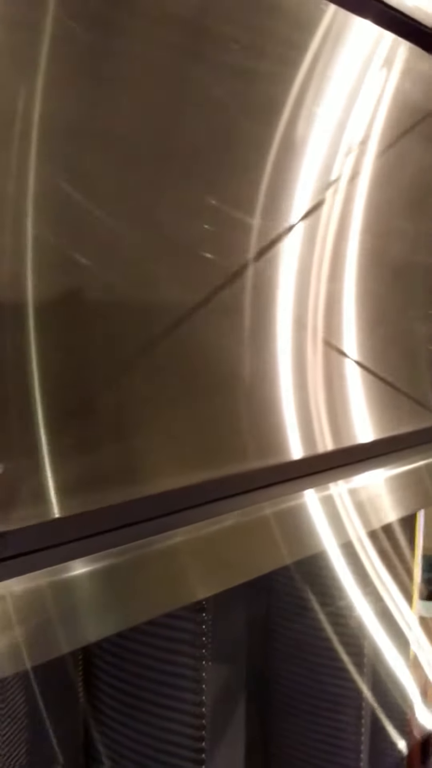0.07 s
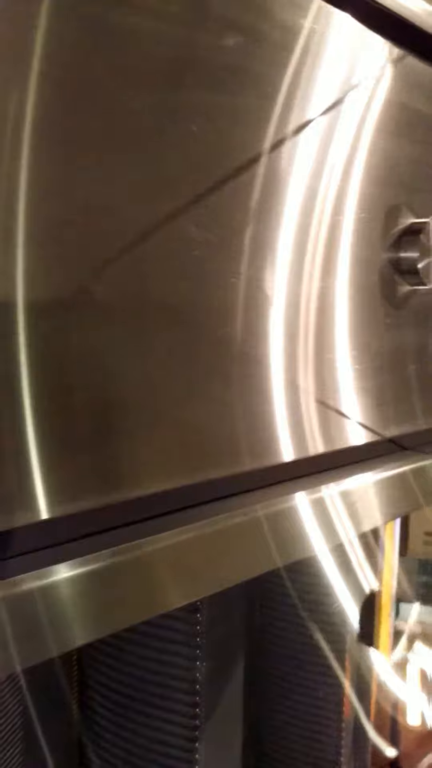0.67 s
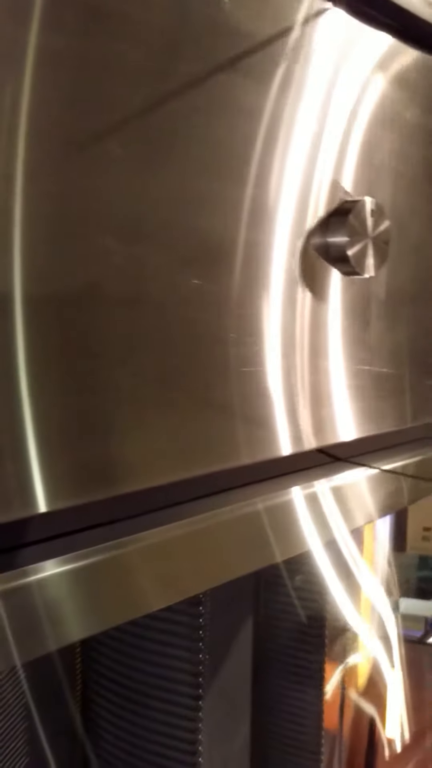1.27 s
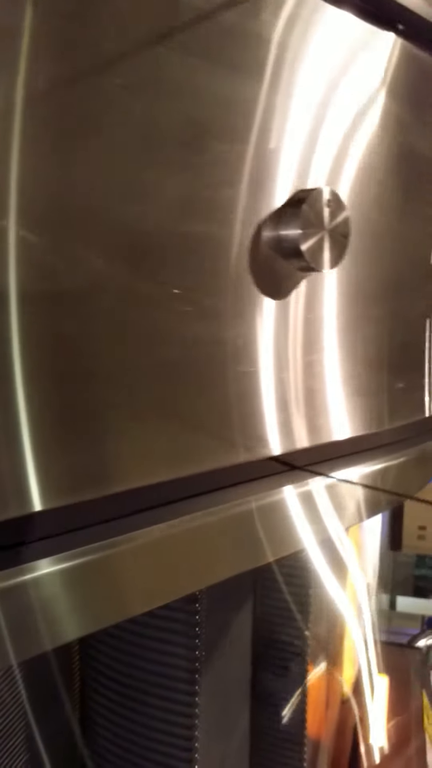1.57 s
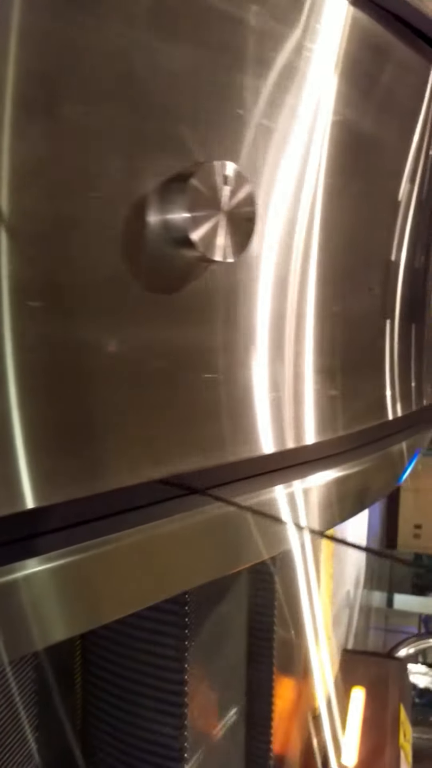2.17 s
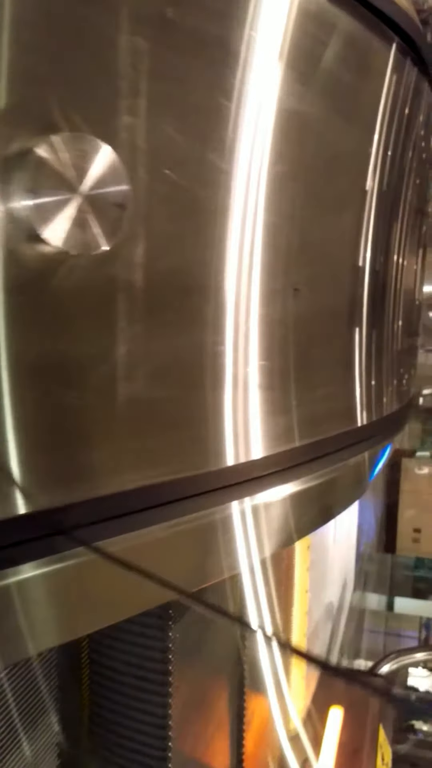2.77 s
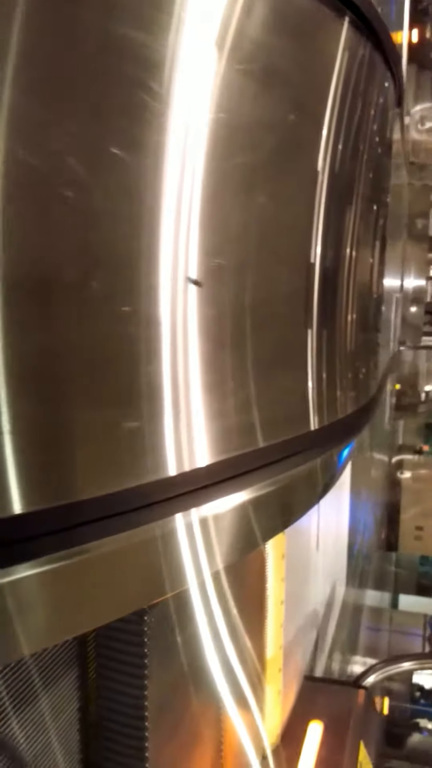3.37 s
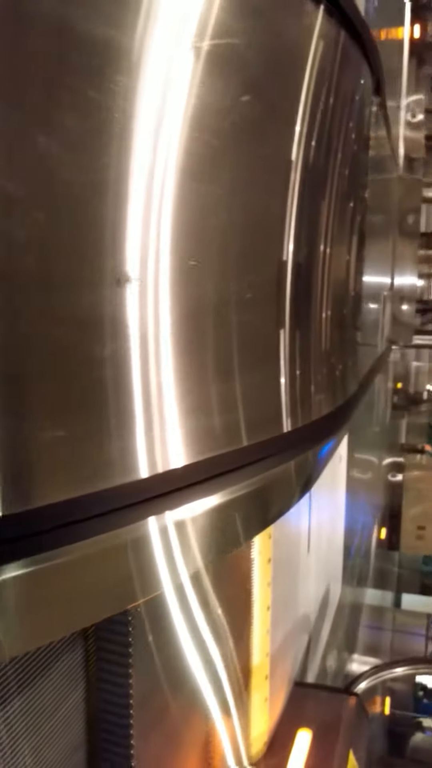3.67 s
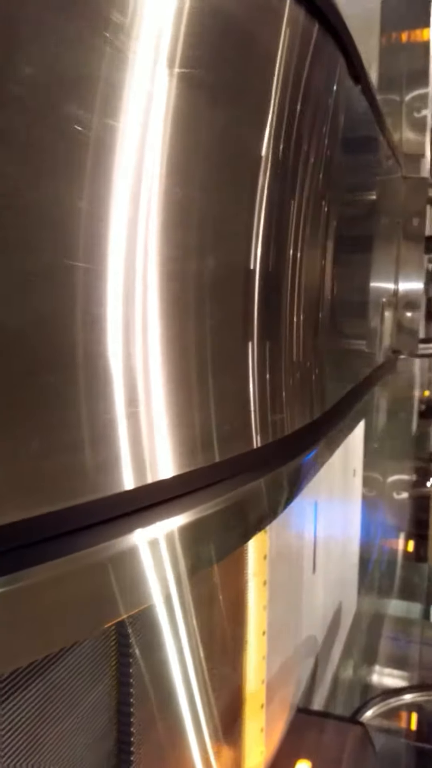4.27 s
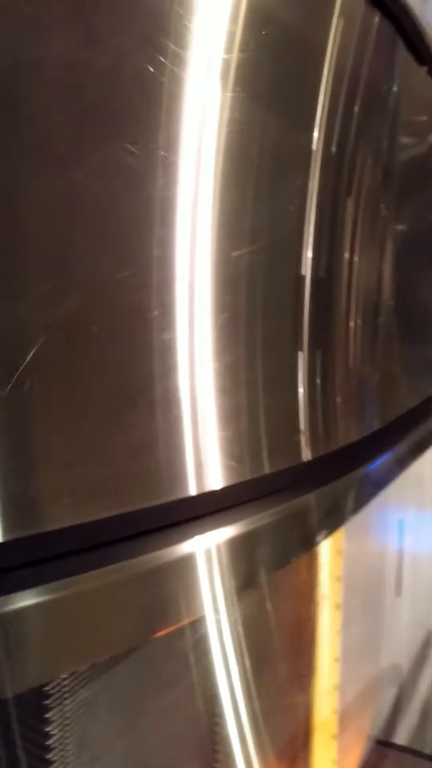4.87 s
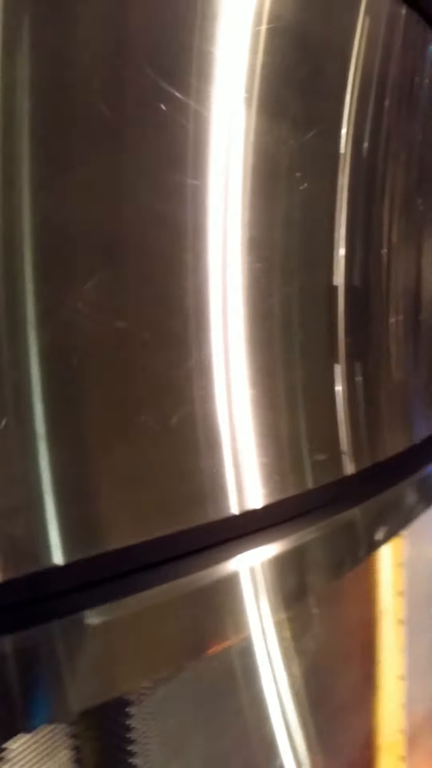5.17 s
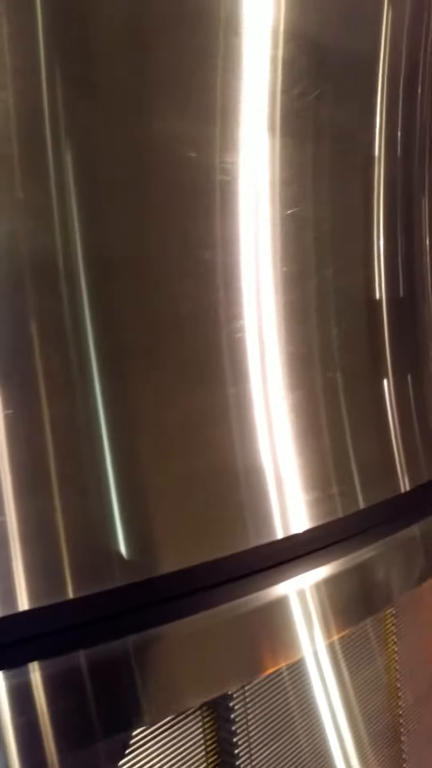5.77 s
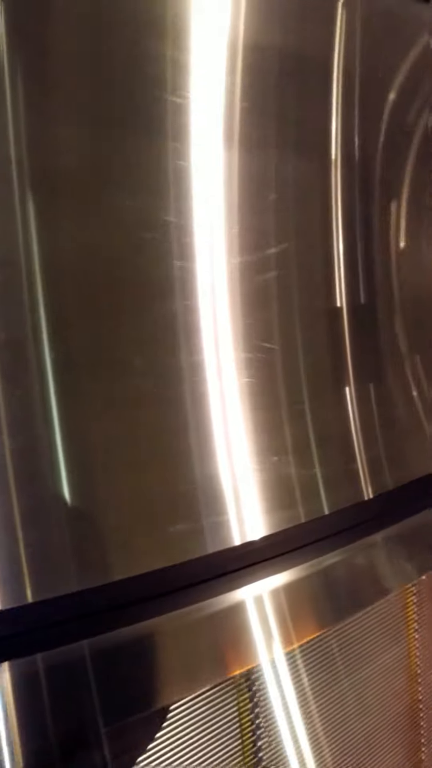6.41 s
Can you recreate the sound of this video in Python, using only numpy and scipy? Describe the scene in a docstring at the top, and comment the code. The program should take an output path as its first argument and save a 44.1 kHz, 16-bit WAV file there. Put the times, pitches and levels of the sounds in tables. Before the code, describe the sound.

The low throbbing drone of a running escalator, with a hissing handrail and a few soft step knocks.

```python
"""An escalator's motor hums and throbs, heard from a moving step in a large hall.
The stereo microphone rides close to the steel side panel. The gearing drones, the truss rumbles
under the steps, and step rollers swell as they pass. The handrail hisses in its guide, pulsing
with the chain, ringing between the panels and sometimes squeaking. Now and then steps knock
and steel edges clink; near the end a panel booms twice."""
import sys
import numpy as np
from scipy import signal
from scipy.fft import rfft, irfft
from scipy.io import wavfile
from scipy.ndimage import uniform_filter1d

SR = 44100
rng = np.random.default_rng(int(sys.argv[2]) if len(sys.argv) > 2 else 0)


def store_pcm(level_fs):
    """Save levels as 16-bit WAV."""
    pcm = np.round(np.clip(level_fs, -1, 1) * 32767).astype(np.int16)
    wavfile.write(sys.argv[1], SR, np.atleast_2d(pcm).T)


N = 288414
TIME = np.arange(N) / SR
FREQS = np.maximum(np.fft.rfftfreq(N, 1 / SR), 1)
SIDES = np.array([[1], [-1]])   # left, right


def from_db(db):
    """Decibels to gain."""
    return 10 ** (np.asarray(db) / 20)


def unit_rms(x):
    """Scale to rms 1."""
    return x / np.sqrt(np.mean(x ** 2) + 1e-20)


def over_time(points):
    """Join (seconds, value) points into a curve."""
    return np.interp(TIME, *np.transpose(points))


def across_hz(points):
    """Join (Hz, value) points on a log frequency axis."""
    hz, value = np.transpose(points)
    return np.interp(np.log(FREQS), np.log(hz), value)


def hump(hz, octaves):
    """Gain over frequency of a broad resonance."""
    return 1 / (1 + (np.log2(FREQS / hz) / octaves) ** 4)


def bell(centre_s, half_s):
    """A smooth swell of height 1 around a moment."""
    return np.exp(-((TIME - centre_s) / half_s) ** 2)


def approach(start_db, db_per_s, nearest_s):
    """A level in dB that rises as a source nears the microphone, then holds."""
    return start_db + db_per_s * np.minimum(TIME, nearest_s)


def pan(db):
    """Channel gains at constant power, the left louder by db."""
    gains = from_db(SIDES * db / 2)
    return gains / np.sqrt(np.mean(gains ** 2, axis=0))


def drift(rate_hz):
    """A smooth random wander with a spread of 1."""
    hop, settle = 40, 2000
    pole = np.exp(-2 * np.pi * rate_hz * hop / SR)
    noise = rng.standard_normal(N // hop + settle + 2)
    slow = signal.lfilter([1], [1, -2 * pole, pole * pole], noise)[settle:]
    return np.interp(np.arange(N) / hop, np.arange(len(slow)), unit_rms(slow))


def tone(hz, wander_hz):
    """A sine of rms 1 whose pitch wanders a little."""
    turns = np.cumsum(hz + wander_hz * drift(1.834)) / SR + rng.random()
    return np.sqrt(2) * np.sin(2 * np.pi * turns)


def evened(noise, share, window_samples):
    """Take a share of the chance swells out of a noise."""
    power = uniform_filter1d(np.mean(noise ** 2, axis=0), window_samples) + 1e-12
    return noise * (power / power.mean()) ** (-share / 2)


def friction_ring(hz, width_hz, lead_rad, pitch_wander=.003, alike=0.86):
    """A resonance kept ringing by friction: a sine of wandering pitch, strength and phase."""
    angle = 2 * np.pi * np.cumsum(hz * (1 + pitch_wander * drift(1.5))) / SR
    mid, side = (drift(width_hz * .7) + 1j * drift(width_hz * .7) for _ in range(2))
    wander = np.sqrt((1 + alike) / 2) * mid + np.sqrt((1 - alike) / 2) * side * SIDES
    return np.real(wander * np.exp(1j * angle) * np.exp(.5j * lead_rad * SIDES))


# The sound field at the microphone. Each row: frequency in Hz, correlation of left and right.
CHANNEL_LIKENESS = [(50, 0.99), (93, 0.99), (150, 0.87), (230, 0.78), (350, 0.059), (550, 0.057),
                    (850, -0.085), (2000, 0.018)]


def stereo_noise(colour, pan_points):
    """Coloured noise, alike on both sides in the bass and diffuse above; rms 1 in the middle."""
    mid, side = rfft(rng.standard_normal((2, N)))
    alike = across_hz(CHANNEL_LIKENESS)
    spectra = np.sqrt(1 + alike) * mid + np.sqrt(1 - alike) * side * SIDES
    noise = irfft(spectra * colour * pan(across_hz(pan_points)), N)
    return noise / np.std(noise.mean(axis=0))


# The truss underfoot. Each row: frequency in Hz, relative level in dB.
TRUSS_SPECTRUM = [(10, -24), (16, -15), (22, -14.5), (36, 2), (48, -5), (59, -0.5), (78, -6.5), (105, -9.5),
                  (121, -7), (140, -11.5), (165, -16.5), (190, -12), (260, -24), (900, -64.5)]
# Where truss, rollers and knocks sit in the image. Each row: frequency in Hz, left over right in dB.
UNDERFOOT_PAN = [(50, -0.5), (110, -3), (150, 0.5), (200, -8), (300, -7.5), (400, 0.5), (560, -6.5),
                 (900, 3.5)]


def truss_rumble(step_hz=2.5, step_db=1.0):
    """The truss shakes, slowly growing louder, and a little harder as each step loads it."""
    load = np.cos(2 * np.pi * step_hz * (TIME - 0.084))
    level_db = -37 + 0.3648 * TIME + step_db * load
    shake = stereo_noise(from_db(across_hz(TRUSS_SPECTRUM)), UNDERFOOT_PAN)
    return from_db(level_db) * evened(shake, share=.35, window_samples=1800)


# Wheels on the track below the steps. Each row: frequency in Hz, relative level in dB.
ROLLER_SPECTRUM = [(130, -20.5), (200, 2.5), (250, 1.5), (310, 0.5), (390, 0.5), (480, -2), (570, -0.5),
                   (700, -3.5), (900, -9.5), (1500, -14), (8000, -63)]
# A wheel passes close to the microphone about once a second.
# Each row: time in seconds, peak level in dB, centre in Hz, half length in seconds.
WHEEL_PASSES = [(2.584, -48, 295, 0.25), (3.66, -45, 420, 0.22), (4.53, -48, 327, 0.21),
                (5.772, -44.5, 440, 0.22)]


def step_rollers(judder_db=1.08):
    """Wheels roll on the track with an uneven grumble that swells as one comes near."""
    level_db = approach(start_db=-49.5, db_per_s=0.98, nearest_s=2.53)
    roll = from_db(level_db) * stereo_noise(from_db(across_hz(ROLLER_SPECTRUM)), UNDERFOOT_PAN)
    for s, peak_db, hz, half_s in WHEEL_PASSES:
        wheel = stereo_noise(hump(hz, octaves=0.72), UNDERFOOT_PAN)
        roll += from_db(peak_db) * bell(s, half_s) * wheel
    return from_db(judder_db * drift(25)) * roll


# A hollow panel to the right of the microphone. Each row: time in seconds, peak level in dB.
PANEL_BOOMS = [(6.195, -36.5), (6.29, -35)]


def panel_booms():
    """A low panel mode swells and dies away."""
    swell = sum(from_db(db) * bell(s, half_s=0.023) for s, db in PANEL_BOOMS)
    return swell * tone(hz=191.8, wander_hz=1.9) * pan(-15)


# Steel edges ringing with the clatter, to the left.
# Each row: start in seconds, peak level in dB, pitch in Hz, time to fall 60 dB in seconds.
EDGE_CLINKS = [(3.225, -46, 3720, .15), (3.447, -48, 2870, .14), (3.974, -44, 2510, .1),
               (3.978, -43, 3790, .14), (4.004, -41.5, 3720, .2), (4.535, -46, 2870, .14),
               (4.587, -43, 3950, .08), (4.643, -41, 3840, 0.065), (4.986, -44, 2870, .08),
               (4.988, -45, 2480, .14), (5.18, -51, 2370, .12), (6.384, -45, 2380, .12)]


def edge_clinks():
    """Each touch sets one clean steel mode ringing and dying away."""
    out = np.zeros(N)
    for s, peak_db, hz, t60 in EDGE_CLINKS:
        age = np.maximum(TIME - s, 0)
        out += from_db(peak_db - 60 * age / t60) * np.sin(2 * np.pi * hz * age)
    return out * pan(13.5)


# Steps knocking in their guides. Each row: start in seconds, ring level in dB before the trim,
# centre in Hz, time to fall 60 dB in seconds, width in octaves, crack level in dB,
# lead of the left channel in radians.
STEP_KNOCKS = [(2.282, -34, 1150, 0.1, .7, -22.5, 2), (2.283, -35.5, 600, .1, 0.61, -31, 1.2),
               (2.286, -32, 450, 0.08, .35, -24.5, 2), (2.289, -37, 850, .1, 1.2, -30, 0),
               (2.887, -37.5, 1000, 0.17, 1.1, -34, 0), (2.888, -36, 382, 0.13, 0.57, -38, 0),
               (3.223, -33, 744, 0.12, 0.1, -31.5, 1.3), (3.229, -36, 1150, 0.11, 0.72, -32, 1),
               (3.977, -45, 940, .12, 1.2, -32, 0), (3.984, -35, 720, 0.15, 0.66, -28.5, 0.5),
               (4.006, -38.5, 800, 0.2, 0.99, -34, -1), (4.262, -36.5, 650, .14, .8, -34, -0.5),
               (4.471, -37.5, 553, 0.18, 0.15, -33, 1.3), (4.544, -38, 1500, 0.17, 0.82, -38, -1),
               (4.590, -35, 696, 0.19, 0.56, -40, 1), (4.981, -40, 1230, 0.09, 0.4, -28, 1.5),
               (4.986, -41, 1190, .07, 0.09, -28, 1), (4.992, -41, 700, .13, .6, -34, -4),
               (5.056, -33, 900, 0.14, 0.93, -30, 0)]


def step_knocks(trim_db=-8.5, attack_s=0.0021, hall_db=-30.5, hall_t60_s=0.65, crack_cycles=0.7):
    """A short crack, then a crowd of step modes rings briefly; the hall answers with a faint tail."""
    out = np.zeros((2, N))
    for s, ring_db, hz, t60, octaves, crack_db, lead_rad in STEP_KNOCKS:
        age = np.maximum(TIME - s + SIDES * lead_rad / (4 * np.pi * hz), 0)
        # the narrower the knock, the more cycles its crack lasts
        crack = np.sin(2 * np.pi * hz * age) * np.exp(-age * hz * octaves / crack_cycles)
        modes = evened(stereo_noise(hump(hz, octaves), UNDERFOOT_PAN), share=1, window_samples=600)
        attack = 1 - np.exp(-age / attack_s)
        decay = from_db(-60 * age / t60) + from_db(hall_db - 60 * age / hall_t60_s)
        out += from_db(crack_db) * crack + from_db(ring_db + trim_db) * attack * decay * modes
    return out


# The handrail squeaking, well to the left. Each row: time in seconds, peak level in dB, pitch in Hz.
RAIL_SQUEAKS = [(3.39, -50, 2400), (4.81, -49, 2550), (6.16, -50, 4520)]


def handrail_squeaks():
    """Friction briefly makes one resonance sing out."""
    out = np.zeros((2, N))
    for s, peak_db, hz in RAIL_SQUEAKS:
        out += from_db(peak_db) * bell(s, half_s=0.024) * friction_ring(hz, width_hz=190, lead_rad=0)
    return out * pan(19)


# The handrail sliding in its guide, close by. Each row: frequency in Hz, relative level in dB.
RAIL_SPECTRUM = [(150, -41.5), (350, -14.5), (650, 3), (850, -2.5), (1030, -3), (1400, -0.5), (2000, -2),
                 (3000, -2), (3900, -1), (4400, -3), (5700, -8.5), (7000, -11.5), (7700, -16.5),
                 (8300, -25.5)]
# Its hiss lies mostly to the left. Each row: frequency in Hz, left over right in dB.
RAIL_PAN = [(700, -1.5), (1000, 4.5), (1400, 1.5), (1900, 7.5), (2200, 7), (2500, 7.5), (3000, 14.5),
            (3400, 14.5), (4100, 17.5), (4900, 16), (6000, 11.5), (7300, 10.5), (8200, 20)]
# It presses harder on the guide. Each row: time in seconds, added level in dB.
RAIL_RUBS = [(3.35, 1.2), (4.0, 1.2), (4.62, 1.8)]
# The microphone shifts along the panel. Each row: time in seconds, place (0 to 2; beyond counts as 2).
MIC_PLACES = [(3.45, 0.5), (3.85, 1.1), (5.2, 1.04), (5.65, 2.5)]
# Resonances of the gap between the steel panels. Each row: pitch in Hz, lead of the left channel
# in radians, then relative levels in dB at places 0, 1 and 2.
PANEL_GAP_MODES = [(551.3, .6, -7.5, -8, -14), (604, 0.7, -9.5, -17.5, -20.5), (703, -2, -21.5, -10, -14.5),
                   (831, -2.5, -15, -12, -17), (1177, -0.5, -12.5, -14.5, -11),
                   (1278, 0.2, -19.5, -23, -16), (1390, -0.5, -18, -20, -22), (1516, 2, -14.5, -21, -13.5),
                   (1698, 2.5, -17.5, -12, -8), (1843, 2, -21.5, -24, -18), (2014, 3.5, -12.5, -10, -14),
                   (2190, -1.4, -23.5, -28, -10), (2364, -0.1, -10, -13, -12),
                   (2525, -0.7, -18.5, -12, -19), (2690, -1, -21, -28.5, -13.5), (2860, 2.5, -11, -10, -21),
                   (3030, -2.5, -27.5, -16.5, -12.5), (3194, 2.5, -15.5, -17, -29.5),
                   (3382, 3, -13, -10, -11.5), (3490, 0.5, -20, -27, -19.5), (3666, -0.9, -18, -19, -13.5),
                   (3740, 0.5, -15, -15.5, -22.5), (3880, -0.5, -26, -21.5, -16.5),
                   (4030, 2, -15.5, -21, -25), (4210, -1.5, -19.5, -15.5, -15),
                   (4560, 2.5, -16.5, -13.5, -16), (4885, 0.5, -20, -18, -25), (5350, 1.5, -20.5, -22, -27)]


def handrail_hiss(link_hz=15.05, sway_hz=2.94, ring_boost_db=1.0, flare_db=1.4, grain_db=0.73):
    """Sliding hiss pulses with each chain link; different resonances stand out as the microphone moves."""
    place = over_time(MIC_PLACES)
    slide = stereo_noise(from_db(across_hz(RAIL_SPECTRUM)), RAIL_PAN)
    for hz, lead_rad, *levels_db in PANEL_GAP_MODES:
        mode_db = ring_boost_db + np.interp(place, [0, 1, 2], levels_db)
        mode_db += flare_db * drift(6.1)   # flares and fades as the contact shifts
        width_hz = 54 * np.sqrt(hz / 1800)   # higher resonances are wider and rougher
        pan_db = np.interp(hz, *np.transpose(RAIL_PAN))
        slide += from_db(mode_db) * friction_ring(hz, width_hz, lead_rad) * pan(pan_db)
    level_db = approach(start_db=-52.5, db_per_s=0.9577, nearest_s=5.3)
    rub_db = sum(db * bell(s, half_s=0.16) for s, db in RAIL_RUBS)
    link_db = 0.35 * np.cos(2 * np.pi * link_hz * (TIME - .008))
    sway_db = 0.34 * np.cos(2 * np.pi * sway_hz * (TIME - .245))
    return from_db(level_db + rub_db + link_db + sway_db + grain_db * drift(25)) * slide


# The gearing's tones, mostly to the right. Each row: pitch in Hz, level in dB, left over right in dB,
# multiple of the swell (a negative one sinks as the swell rises).
GEAR_TONES = [(88.4, -51.5, 1, -.3), (110.2, -50, 2, -1.6), (119.5, -55, -0.5, 0.35),
              (175, -71.5, -3, 0.84), (179.7, -48, -9.5, 1), (189.5, -45.5, -13.5, 1),
              (209.8, -62, -7.5, -0.77), (227.2, -59.5, -4.5, 0)]
# The swell of the drone at the microphone. Each row: time in seconds, swell in dB.
DRONE_SWELL = [(0, -.5), (4.4, 0), (5.2, -3.5), (6.2, 2), (6.54, 3)]


def gear_drone(waver_db=1.5):
    """The gearing drones in wavering low tones that beat against each other."""
    swell_db = over_time(DRONE_SWELL)
    out = np.zeros((2, N))
    for hz, level_db, pan_db, multiple in GEAR_TONES:
        gain = from_db(level_db + multiple * swell_db + waver_db * drift(1.1))
        out += gain * tone(hz, wander_hz=0.28) * pan(pan_db)
    return out


# The motor's hum as it reaches the step. Each row: time in seconds, level in dB before the trim.
HUM_LEVELS = [(0, -33.5), (.25, -38.5), (0.42, -38.5), (0.7, -34), (1.3, -40.5), (1.45, -27), (1.72, -34.5),
              (2.45, -34), (2.92, -29.5), (3.4, -31), (3.8, -34.5), (4.06, -31), (4.19, -40), (4.33, -37),
              (4.8, -33.5), (5.25, -27), (5.58, -28), (5.8, -34.5), (6.2, -41.5), (6.45, -33)]
# Jolts that shake the drive. Each row: time in seconds, peak level in dB.
DRIVE_JOLTS = [(.385, -26), (.535, -35), (.71, -30.5), (.94, -31.5), (1.405, -31.5), (2.235, -37),
               (2.33, -38), (3.012, -33), (4.075, -33), (4.55, -35), (5.98, -27), (6.19, -31.5),
               (6.39, -37)]


def motor_hum(hum_hz=49.27, trim_db=0.07, throb_hz=10.4, throb_db=-44.5):
    """The motor's fundamental swells and sinks, throbs unevenly and leaps with each jolt."""
    swell = from_db(over_time(HUM_LEVELS) + trim_db)
    throb_spectrum = rfft(rng.standard_normal(N)) * hump(throb_hz, octaves=0.97)
    throb = from_db(throb_db) * unit_rms(irfft(throb_spectrum, N))
    jolts = sum(from_db(db) * bell(s, half_s=0.025) for s, db in DRIVE_JOLTS)
    return (swell + throb + jolts) * tone(hum_hz, wander_hz=0.12) * pan(-.9)


def scene():
    """The whole escalator, heard from one of its steps beside the panel."""
    low_end = motor_hum() + gear_drone() + truss_rumble() + panel_booms()
    running = handrail_hiss() + step_rollers()
    return low_end + running + step_knocks() + handrail_squeaks() + edge_clinks()


def record(dry):
    """The microphone signal is cut steeply above 8350 Hz."""
    lowpass = signal.ellip(12, .2, 80, 8350, fs=SR, output="sos")
    return signal.sosfilt(lowpass, dry)


dry = scene()
out = record(dry)
store_pcm(out)
```